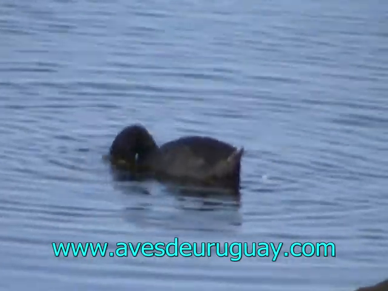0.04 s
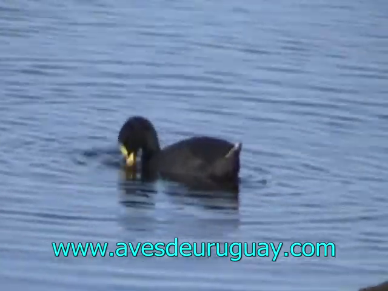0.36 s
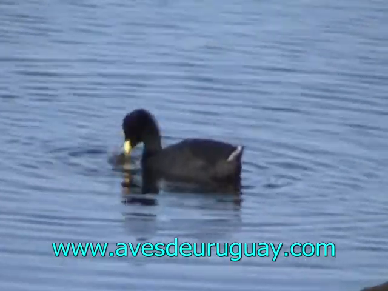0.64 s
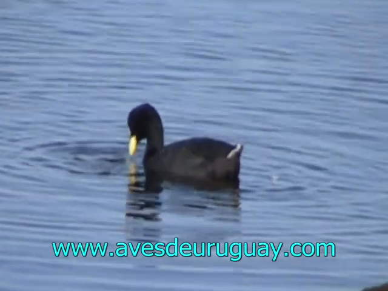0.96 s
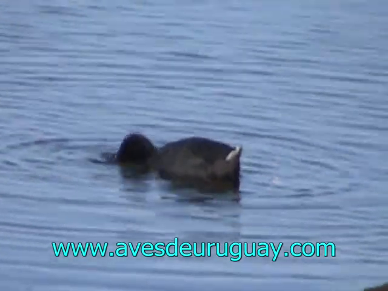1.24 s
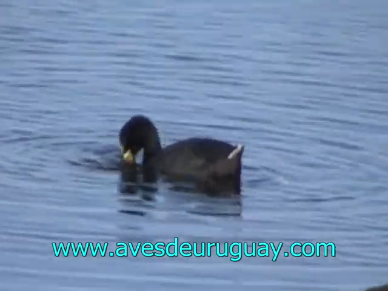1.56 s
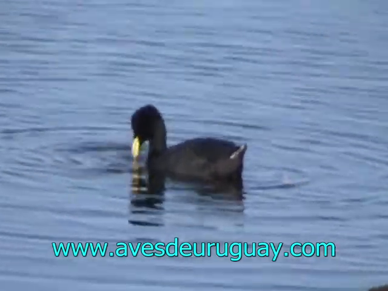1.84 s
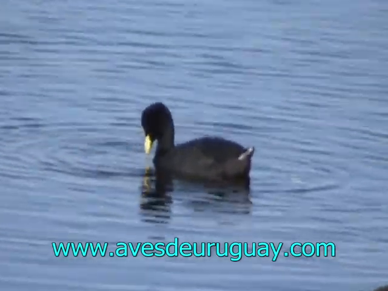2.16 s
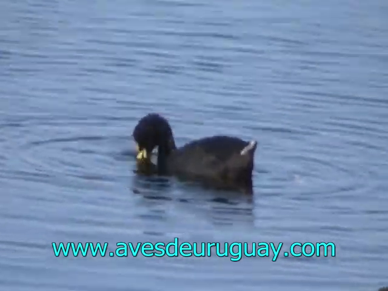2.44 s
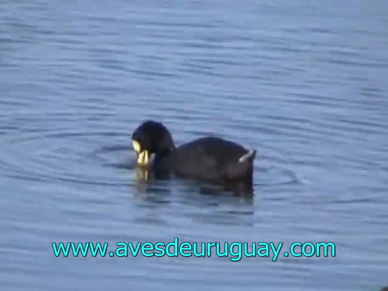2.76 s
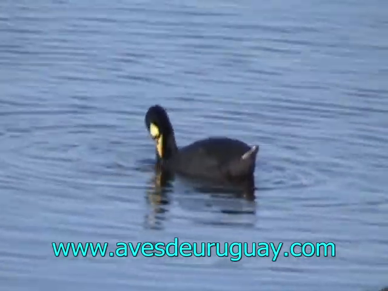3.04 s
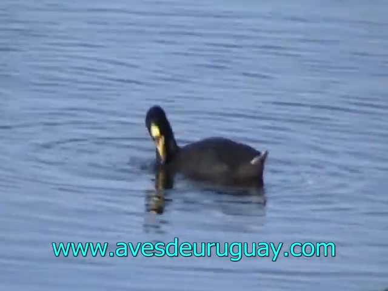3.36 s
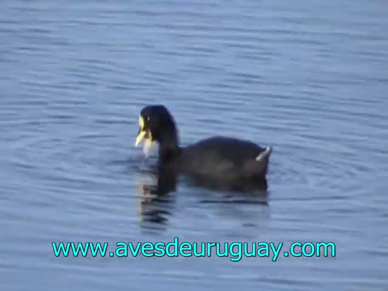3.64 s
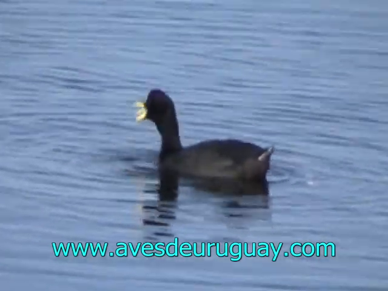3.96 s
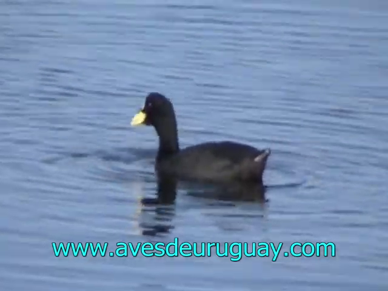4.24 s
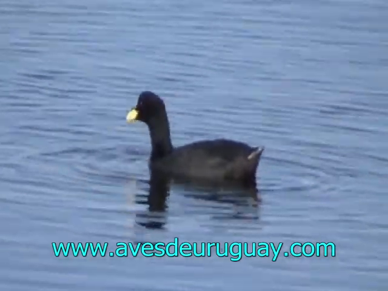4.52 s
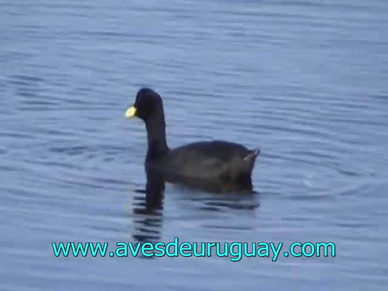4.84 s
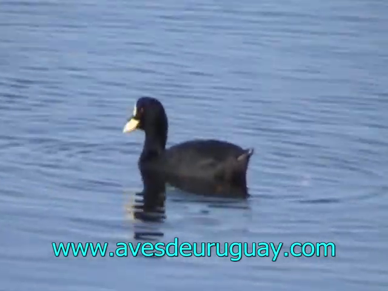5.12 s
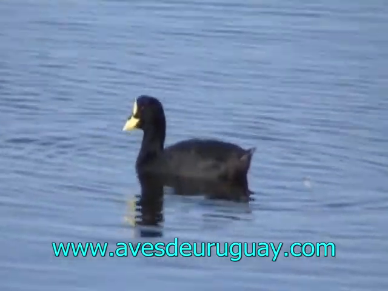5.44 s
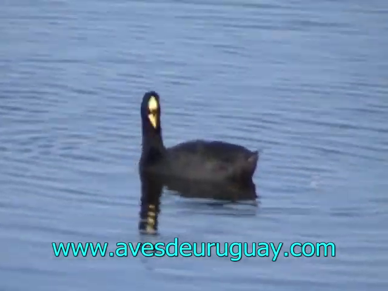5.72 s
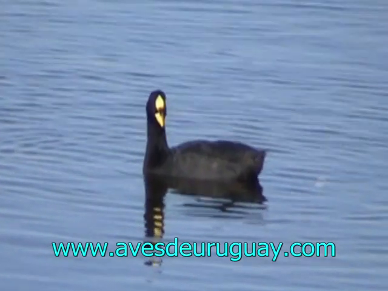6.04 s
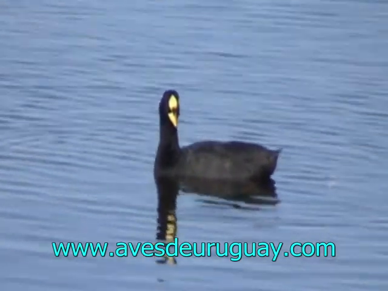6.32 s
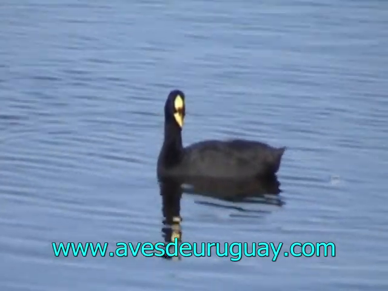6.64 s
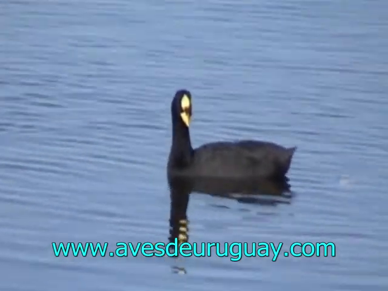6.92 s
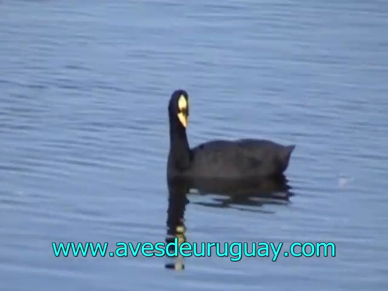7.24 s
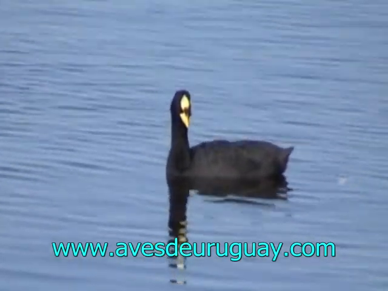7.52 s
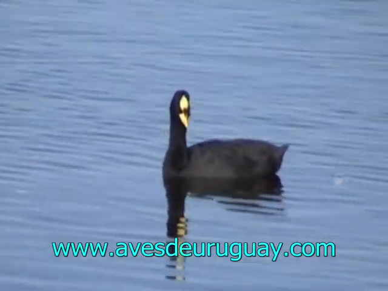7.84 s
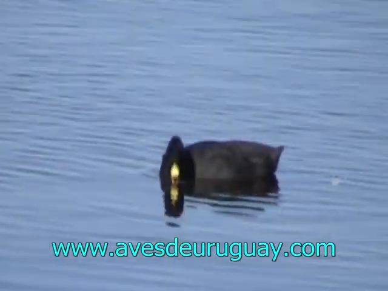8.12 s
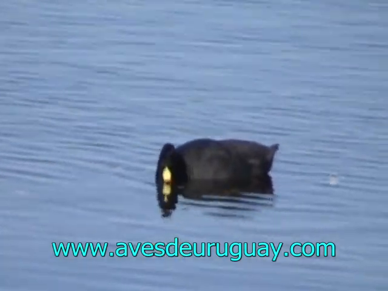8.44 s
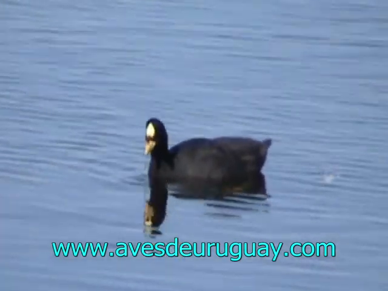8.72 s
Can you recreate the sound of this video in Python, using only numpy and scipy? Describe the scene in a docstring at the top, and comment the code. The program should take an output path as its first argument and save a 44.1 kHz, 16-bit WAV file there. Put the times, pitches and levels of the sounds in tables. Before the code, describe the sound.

Small birds chatter and peep beside a pond as a vehicle drones past from left to right and fades away.

```python
"""A pond beside a road, calm day. From the start: light air, a camera's faint whine, and a motor vehicle
nearing from the left, its exhaust beating against a steadier drone. A small bird gives falling chatters
at 0.5, 3.4 and 6.2 s; others peep further off from 0.8 s; one tick at 1 s. The tyres roar on approach
and low hums swell from about 3.4 s. Abreast at 4.35 s, the exhaust note sinks by Doppler shift;
the tyres roar again as the vehicle leaves to the right."""
import sys
import numpy as np
from scipy import signal
from scipy.fft import rfft, irfft, next_fast_len
from scipy.io import wavfile

SR = 44100
rng = np.random.default_rng(int(sys.argv[2]) if len(sys.argv) > 2 else 0)


def wav_record(signal):
    """Record a signal, one row per channel, as 16-bit PCM in the file named by sys.argv[1]."""
    frames = np.transpose(np.atleast_2d(signal))
    bounded = np.clip(frames, -1, 1)
    # unit amplitude maps onto the largest positive 16-bit level
    quanta = np.round(bounded * 32767).astype(np.int16)
    wavfile.write(sys.argv[1], SR, quanta)


N = 396018
TIME = np.arange(N) / SR


def from_db(db):
    """Decibels to gain."""
    return 10 ** (np.asarray(db) / 20)


def in_time(rows):
    """One linearly interpolated curve per column after t/s."""
    times_s, *columns = np.transpose(rows)
    return [np.interp(TIME, times_s, column) for column in columns]


def gain_at(points, hz):
    """Gain of an (f/Hz, level/dB) table on a log-frequency axis."""
    points_hz, db = np.transpose(points)
    return from_db(np.interp(np.log(hz + 1e-3), np.log(points_hz), db))


def panned(left_db):
    """Stereo gains of mean 1; left_db is left minus right."""
    gains = from_db(np.array([[.5], [-.5]]) * left_db)
    return gains / gains.mean(axis=0)


def drift(cutoff_hz):
    """Slow random curve, rms 1."""
    hz = np.fft.rfftfreq(N, 1 / SR)
    slow = irfft(rfft(rng.standard_normal(N)) / (1 + (hz / cutoff_hz) ** 4), N)
    return slow / np.sqrt(np.mean(slow ** 2) + 1e-20)


def phase_of(hz):
    """Running phase/rad of a changing frequency."""
    return 2 * np.pi * np.cumsum(hz) / SR


def wide_noise(colour):
    """Coloured stereo noise, near mono in the bass; mid rms 1."""
    # outdoor stereo width: f/Hz, side minus mid/dB
    width = [(30, -34), (110, -29), (250, -3.5), (500, -2), (750, 1.5), (1100, -4), (2200, -4.5),
             (4500, -6), (8000, -3), (12000, -11.5)]
    size = next_fast_len(N)
    hz = np.fft.rfftfreq(size, 1 / SR)
    shape = gain_at(colour, hz) * (hz > 15)
    mid_spectrum, side_spectrum = rfft(rng.standard_normal((2, size))) * shape
    mid = irfft(mid_spectrum, size)[:N]
    side = irfft(side_spectrum * gain_at(width, hz), size)[:N]
    return (mid + side * np.array([[1], [-1]])) / np.std(mid)


def add(track, start_s, sound):
    """Mix a short stereo sound into a track."""
    start = max(int(start_s * SR), 0)
    track[:, start:start + sound.shape[1]] += sound[:, :max(N - start, 0)]


def air(level_db=-48.0):
    """Light air and microphone hiss."""
    # noise spectrum: f/Hz, relative density/dB
    colour = [(20, -18), (35, -1), (110, 0.5), (180, -13), (280, -26), (400, -20.5), (700, -23),
              (1100, -19), (2200, -24.5), (4000, -29), (6000, -31), (7300, -37), (9500, -34.5),
              (10500, -33.5)]
    return from_db(level_db) * wide_noise(colour)


def camera_whine(waver=0.00074):
    """Three faint tones, slightly unsteady in pitch."""
    # whine tones: f/Hz, level/dB
    tones = [(699.8, -72.5), (839.8, -68.5), (10158, -84)]
    return np.sqrt(2) * sum(from_db(db) * np.sin(phase_of(hz * (1 + waver * drift(8.1))))
                            for hz, db in tones)


def exhaust(phase, near, going, boom_db=-31.0, far_waver_db=3.1, flutter_db=1.5, fade_cycle_s=2.422):
    """Firing harmonics: uneven firing shakes the overtones; close by, a reflection fades them."""
    # exhaust strength apart from distance: t/s, gain/dB
    swell = [(0, 0), (1.0, 1.5), (1.7, -3.5), (2.1, 0), (2.7, -2), (3.5, -2.5), (4.2, 1), (4.65, 0),
             (5.2, -4), (5.7, 0), (6.6, -7), (8.2, -6.5)]
    # harmonics 2-4: base level/dB, rear gain/dB, distance exponent, notch t/s, fade depth/0-1
    overtones = [(-43.5, 0.0, 1.23, 4.595, 0.67), (-53.5, -1, 1.03, 4.75, 0.66), (-59, 4, 0.84, 4.4, 0.4)]
    swell_db, = in_time(swell)
    air_waver_db = far_waver_db * (1 - near) * drift(6.6)
    sound = near * from_db(boom_db + swell_db + air_waver_db) * np.sin(phase)
    for k, (db, rear_db, falloff, notch_s, depth) in enumerate(overtones, 2):
        reflection = depth * near ** 2 * np.exp(2j * np.pi * k * (TIME - notch_s) / fade_cycle_s)
        level_db = db + 0.33 * swell_db + rear_db * going + flutter_db * drift(10.3)
        sound += near ** falloff * np.abs(1 - reflection) * from_db(level_db) * np.sin(k * phase)
    return np.sqrt(2) * sound


def ground_echo(sound, lag_ms, strength, cutoff_hz=2700):
    """Add a reflection whose changing lag sweeps a comb; rough ground returns no treble."""
    dull = signal.sosfilt(signal.butter(2, cutoff_hz, fs=SR, output="sos"), sound)
    echo = np.array([np.interp(TIME - lag_ms / 1000, TIME, ear) for ear in dull])
    return sound + strength * echo


def beamed(beams, going):
    """Gain of Gaussian beams swinging past the listener."""
    angle_deg = np.degrees(np.arcsin(going))
    power = sum(from_db(db) ** 2 * np.exp(-((angle_deg - aim_deg) / width_deg) ** 2)
                for aim_deg, width_deg, db in beams)
    return np.sqrt(power)


def tyres(near, going, road_db=0.5, far_lag_ms=1.81, abreast_lag_ms=0.75, approach_lag_ms=0.16):
    """Hiss and roar, beamed fore and aft, follow the uneven road and reflect off the ground."""
    # tyre spectra: f/Hz, relative density/dB
    hiss_colour = [(150, -16), (380, 3.5), (550, 1.5), (700, -2.5), (900, 1.5), (1350, -9), (1700, -2),
                   (2100, -1), (2500, -7.5), (4000, -11.5), (7000, -18), (13000, -29.5)]
    roar_colour = [(150, 2), (400, -14), (550, -4.5), (720, -5.5), (1000, -1), (1400, -1.5), (2200, -5.5),
                   (3000, -13), (5000, -16.5), (13000, -58)]
    # tyre beams: angle from abreast/deg, width/deg, level before distance loss/dB
    hiss_beams = [(-55, 12.3, -46), (64, 8.9, -51)]
    roar_beams = [(-42.5, 20, -48.5), (54.5, 30.3, -49.5)]
    hiss = beamed(hiss_beams, going) * wide_noise(hiss_colour)
    roar = beamed(roar_beams, going) * wide_noise(roar_colour)
    direct = near * from_db(road_db * drift(7.8)) * (hiss + roar)
    lag_ms = far_lag_ms + (abreast_lag_ms - far_lag_ms) * near - approach_lag_ms * going
    return ground_echo(direct, lag_ms, strength=0.42 * near * (1 - 0.8 * going))


def rumble(phase, near, going, base_db=-43.5, rear_db=1.25, flutter_db=1.0,
           far_lag_ms=4.1, abreast_lag_ms=3.52):
    """Body rumble: pulses with each firing, louder from behind."""
    # body spectrum: f/Hz, relative density/dB
    colour = [(20, -22), (60, 5), (120, 2), (180, -3), (260, -5.5), (350, -9.5), (500, -12), (700, -16.5),
              (1200, -22), (3000, -25), (13000, -46)]
    gain = near ** 1.16 * from_db(base_db + rear_db * going + flutter_db * drift(9.6))
    throb = 1 + 0.29 * np.sin(phase)
    lag_ms = far_lag_ms + (abreast_lag_ms - far_lag_ms) * near
    return ground_echo(gain * throb * wide_noise(colour), lag_ms, strength=0.25)


def vehicle(abreast_s=4.35, distance_m=15.4, speed_m_per_s=14.0, firing_hz=70.6,
            recede_s=8, recede_db_per_s=5):
    """A straight, steady pass sets the Doppler shift, level and bearing."""
    along_m = speed_m_per_s * (TIME - abreast_s)
    range_m = np.hypot(distance_m, along_m)
    near = distance_m / range_m  # 1 abreast
    going = along_m / range_m  # -1 coming, +1 going
    phase = phase_of(firing_hz / (1 + going * speed_m_per_s / 343))  # sound: 343 m/s
    receding = from_db(-recede_db_per_s * np.maximum(TIME - recede_s, 0))
    sound = exhaust(phase, near, going) + receding * (tyres(near, going) + rumble(phase, near, going))
    return sound * panned(left_db=-1.14 + 5 * near - 1.2 * going)


def drone(flutter_db=1.2):
    """A lower, steadier engine note that beats against the exhaust."""
    # engine note: t/s, f/Hz, level/dB
    note = [(0, 62.9, -48), (1.2, 62.4, -44.5), (2.3, 62.5, -49.5), (3.2, 62.5, -52), (4, 62.6, -44),
            (5, 62.9, -51.5), (7, 61.3, -55.5), (9, 61.3, -55)]
    hz, db = in_time(note)
    amplitude = np.sqrt(2) * from_db(db + flutter_db * drift(3.8))
    return amplitude * np.sin(phase_of(hz)) * panned(left_db=-1.5)


def whistle(length_s, from_hz, to_hz, overtone_db, waver, skew=0.92):
    """One gliding, unsteady bird note, nearly a sine; skew above 1 delays its peak."""
    progress = np.linspace(0, 1, max(int(length_s * SR), 8))
    unsteady = np.interp(progress, np.linspace(0, 1, 12), rng.standard_normal(12))
    phase = phase_of(from_hz * (to_hz / from_hz) ** progress * (1 + waver * unsteady))
    envelope = np.sin(np.pi * progress ** skew)
    return envelope * (np.sin(phase) + from_db(overtone_db) * np.sin(2 * phase))


def chatters(notes=9, gap_s=0.0175, slowing_s=0.00065, first_db=-5.0, step_db=0.95, uneven_db=0.5):
    """A small bird's runs of falling notes, strong and weak in turn, slowing, sinking and fading."""
    # calls: t/s, base level/dB, left minus right/dB
    calls = [(0.4885, -37.8, 5.5), (3.3835, -35.5, 4), (6.174, -35.8, 6)]
    track = np.zeros((2, N))
    for start_s, call_db, left_db in calls:
        for k in range(notes):
            length_s, pitch_ratio, loss_db = (0.017, 0.94, 2.1) if k % 2 else (0.022, 1, 0)
            settling = np.exp(-k / 2.5)
            from_hz = pitch_ratio * np.interp(settling, [0, 1], [3330, 5450])
            to_hz = pitch_ratio * np.interp(settling, [0, 1], [2300, 2750])
            note = whistle(length_s, from_hz, to_hz, overtone_db=-28, waver=0.025, skew=1.28)
            note_db = call_db + first_db - step_db * k - loss_db + rng.normal(0, uneven_db)
            add(track, start_s, from_db(note_db) * note * panned(left_db))
            start_s += gap_s + slowing_s * k
    return track


def far_birds():
    """One far bird repeats a soft peep; others give single chirps."""
    # peeps: t/s, level/dB
    peeps = [(.825, -61), (1.455, -58.5), (2.218, -58.5), (2.775, -60), (4.06, -62), (4.785, -61),
             (6.10, -61), (6.90, -61), (7.53, -57.5), (8.335, -60)]
    # chirps: t/s, length/s, start f/Hz, end f/Hz, level/dB, left minus right/dB
    chirps = [(.903, 0.021, 3200, 3310, -49, -5), (.916, .026, 3950, 3200, -54, -2.5),
              (6.843, 0.024, 5430, 5986, -55, 3), (6.868, 0.039, 6300, 6270, -50, 5)]
    track = np.zeros((2, N))
    for start_s, db in peeps:
        peep = whistle(length_s=0.06, from_hz=3970, to_hz=3810, overtone_db=-20, waver=0.028)
        add(track, start_s, from_db(db) * peep * panned(left_db=3.3))
    for start_s, length_s, from_hz, to_hz, db, left_db in chirps:
        chirp = whistle(length_s, from_hz, to_hz, overtone_db=-14, waver=0.012)
        add(track, start_s, from_db(db) * chirp * panned(left_db))
    return track


def banks(sound, t60_s, wet_db=-6):
    """Reeds and banks scatter a short tail, different at each ear."""
    t = np.arange(SR // 2) / SR
    tail = rng.standard_normal((2, len(t))) * from_db(-60 * t / t60_s)
    tail /= np.sqrt(np.sum(tail ** 2, axis=1, keepdims=True))
    return sound + from_db(wet_db) * signal.fftconvolve(sound, tail, axes=1)[:, :N]


def tick(peak_s=0.995, level_db=-43.6, decay_s=0.0035):
    """A thin, bright tick that swells and dies within milliseconds."""
    # tick spectrum: f/Hz, relative density/dB
    colour = [(3200, -30), (4000, 2), (5200, -0.5), (6500, -5.5), (8500, -12.5), (12000, -21)]
    envelope = np.exp(-np.minimum(np.abs(TIME - peak_s) / decay_s, 50))
    return from_db(level_db) * envelope * wide_noise(colour)


def hums(flutter_db=2.0, waver=0.012):
    """Low hums, each swelling once out of the rumble, unsteady in level and pitch."""
    # hums: peak t/s, half length/s, f/Hz, level/dB
    swells = [(3.42, 0.2, 222, -50), (3.72, 0.22, 247, -51), (4.72, 0.16, 348, -54.5),
              (4.76, 0.14, 283, -53.5), (7.75, 0.7, 135.5, -52.5)]
    flutter = from_db(flutter_db * drift(5.5))
    pitch_ratio = 1 + waver * drift(12)
    sound = np.zeros(N)
    for peak_s, half_s, hz, db in swells:
        envelope = np.exp(-((TIME - peak_s) / half_s) ** 2)
        sound += from_db(db) * envelope * np.sin(phase_of(hz * pitch_ratio))
    return np.sqrt(2) * flutter * sound * panned(left_db=-3.5)


def scene():
    """Everything heard from the pond's edge."""
    road = vehicle() + drone() + hums()
    near_calls, far_calls = chatters(), far_birds()
    birds = banks(near_calls, t60_s=0.36) + banks(far_calls, t60_s=0.3)
    return road + birds + tick() + camera_whine() + air()


def record(dry, cutoff_hz=12950):
    """Steep low-pass."""
    return signal.sosfilt(signal.ellip(12, .1, 80, cutoff_hz, fs=SR, output="sos"), dry)


dry = scene()
out = record(dry)
wav_record(out)
```